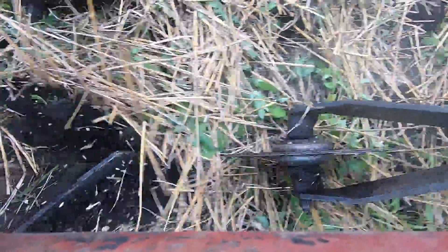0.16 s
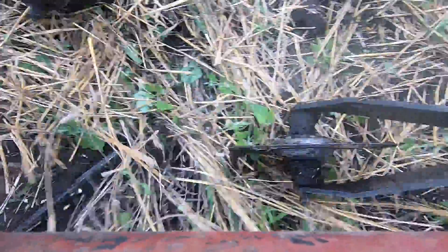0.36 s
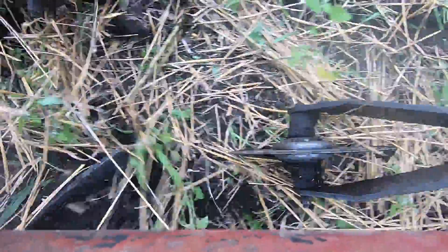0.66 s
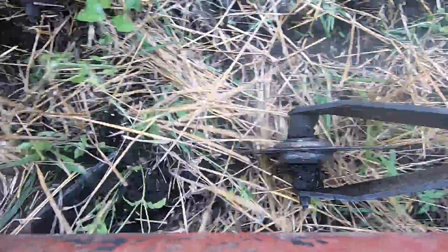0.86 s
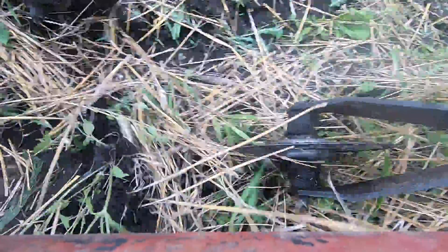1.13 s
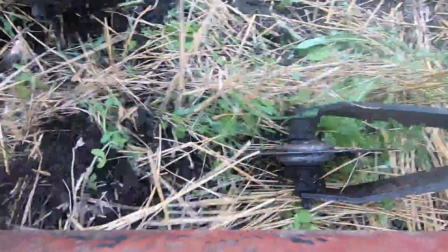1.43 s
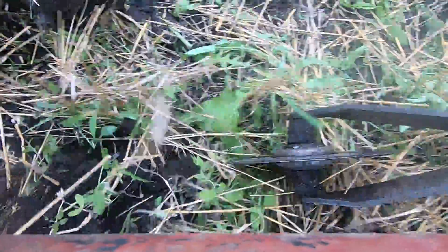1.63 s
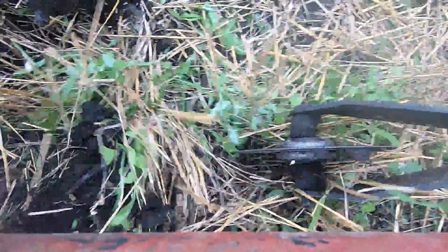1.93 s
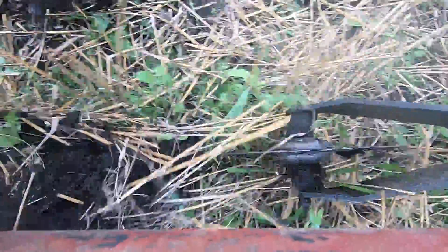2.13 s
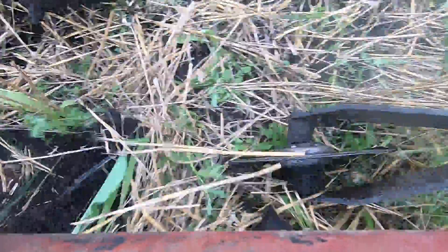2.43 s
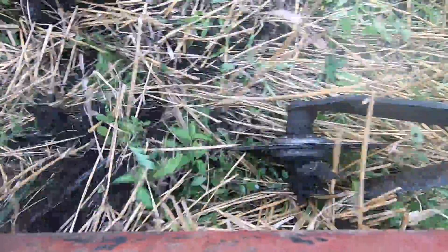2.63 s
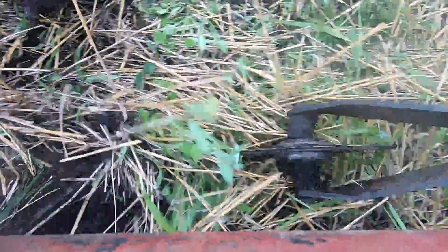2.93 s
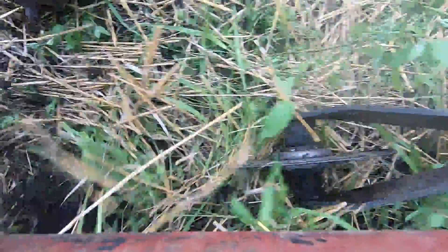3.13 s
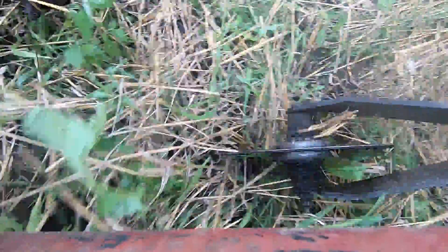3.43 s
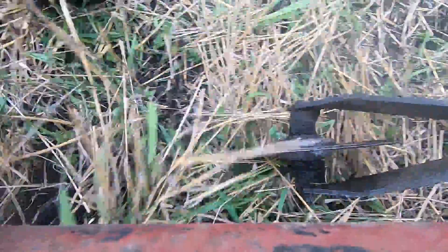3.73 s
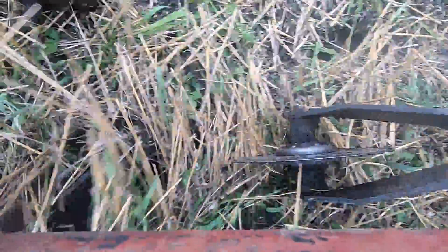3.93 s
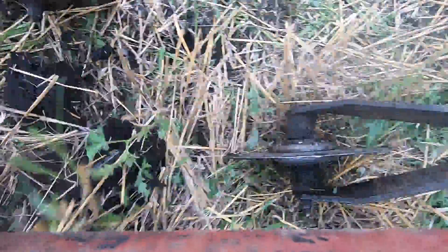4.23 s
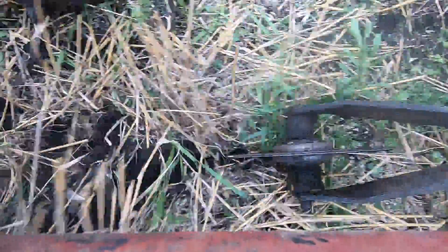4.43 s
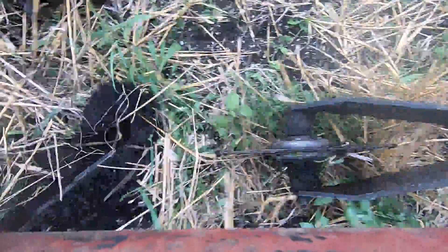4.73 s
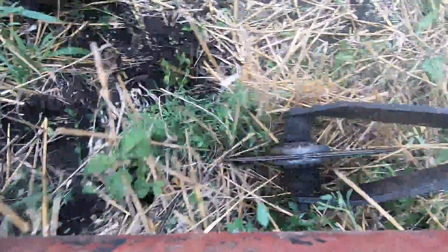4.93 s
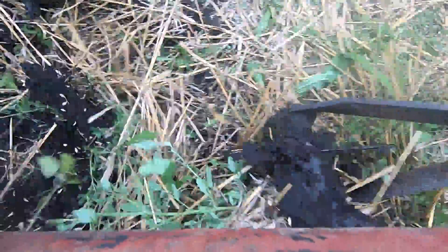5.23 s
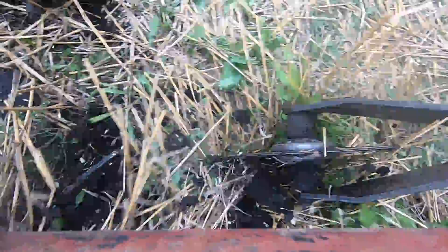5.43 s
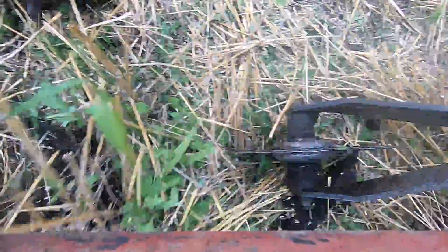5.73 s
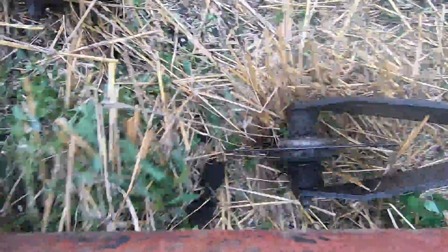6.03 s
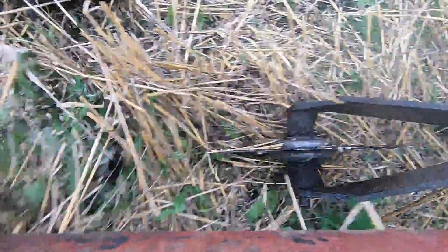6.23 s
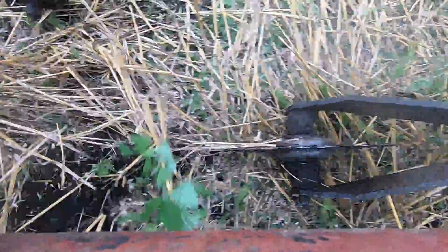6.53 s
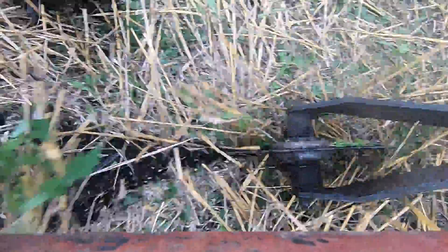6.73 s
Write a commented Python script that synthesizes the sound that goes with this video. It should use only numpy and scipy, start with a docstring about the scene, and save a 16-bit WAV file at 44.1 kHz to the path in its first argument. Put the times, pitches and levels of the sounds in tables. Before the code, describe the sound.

A tractor engine drones loudly just ahead, deep and slightly throbbing, with a light knock and a faint gear whine that comes and goes. Close to the microphone on the plow frame, a disc hisses and crackles through soil and dry stubble. Stalks snap, the linkage and stones clank against the steel, and a few clods thud softly. The engine sags a little in pitch as it pulls across the field.

```python
"""A six-cylinder tractor drones just ahead, heard from a microphone on the frame of the plow it pulls.
The exhaust sounds at the firing rate and throbs once an engine cycle; the gears whine faintly under load.
Close by, the coulter disc crunches through the stubble and stalks snap. The linkage and stones clank,
ringing the frame, and clods thud against the steel."""
import sys
import numpy as np
from scipy import signal
from scipy.fft import rfft, irfft
from scipy.io import wavfile

SR = 44100
rng = np.random.default_rng(int(sys.argv[2]) if len(sys.argv) > 2 else 0)


def log_audio(samples):
    """Write samples as a 16-bit WAV file to the path given in sys.argv[1]."""
    # one column per channel
    frames = np.atleast_2d(samples).T
    # limit to full scale, then quantise
    limited = np.clip(frames, -1, 1)
    pcm = np.round(limited * 32767).astype(np.int16)
    wavfile.write(sys.argv[1], SR, pcm)


N = 302526
TIME = np.arange(N) / SR
BIN_HZ = np.fft.rfftfreq(N, 1 / SR)
CYLINDERS = 6


def amp(db):
    """Decibels to gain."""
    return 10 ** (np.asarray(db) / 20)


def unit(x):
    """Scales to rms 1."""
    return x / np.sqrt(np.mean(x ** 2) + 1e-20)


def curve(rows):
    """Joins (seconds, value) rows into a value at every sample."""
    return np.interp(TIME, *np.transpose(rows))


def colour(x, spectrum):
    """Filters by a spectrum of (Hz, dB) rows."""
    hz, db = np.transpose(spectrum)
    return irfft(rfft(x) * amp(np.interp(np.log(BIN_HZ + 1), np.log(hz), db)), N)


def white():
    """Noise of 0 dB per Hz."""
    return rng.standard_normal(N) * np.sqrt(SR / 2)


def drift(hz):
    """A random wander of rms 1, up to about hz."""
    return unit(irfft(rfft(rng.standard_normal(N)) * np.exp(-(BIN_HZ / hz) ** 2), N))


def resonate(x, hz, width_hz, passes=1):
    """A resonance of gain 1; more passes soften its attack."""
    for _ in range(passes):
        x = signal.lfilter(*signal.iirpeak(hz, hz / width_hz, SR), x)
    return x


def add(mix, start_s, sound):
    """Mixes a sound in at start_s."""
    part = mix[max(round(start_s * SR), 0):][:len(sound)]
    part += sound[:len(part)]


def burst(decay_s, rise_s, grain):
    """A cluster of tiny impacts: its grit, and an envelope that swells and dies."""
    t = np.arange(SR // 5) / SR
    envelope = (1 - np.exp(-t / rise_s)) * np.exp(-t / decay_s)
    grit = rng.standard_normal(len(t)) * np.exp(grain * rng.standard_normal(len(t)))
    return unit(grit), envelope / envelope.max()


# Engine speed, sagging in heavy soil. Each row: time in seconds, firings per second.
FIRING_RATE = [(0.0, 83.73), (0.5, 87.76), (1.11, 84.35), (1.53, 84.65), (1.91, 82.39), (2.35, 81.68),
               (2.64, 83.85), (3.09, 84.09), (3.9, 81.98), (4.2, 82.84), (4.93, 79.73), (5.33, 80.34),
               (5.7, 81.54), (6.09, 81.01), (6.86, 79.67)]

def engine_cycles():
    """Counts engine cycles; every cylinder fires once in each."""
    return np.cumsum(curve(FIRING_RATE)) / SR / CYLINDERS


# The exhaust, steady but for three shallow dips. Each row: time in seconds, level in dB.
EXHAUST_LEVEL = [(0, -13.5), (1.3, -13.4), (1.52, -15.5), (1.8, -13), (2.0, -15), (2.56, -13.1),
                 (2.75, -15.5), (3.2, -13), (6.86, -13.4)]

def exhaust(cycle, load_db, throb=0.14, sway_rad=0.29):
    """Unequal cylinders make the firing tone swell and drag once a cycle; load hardens it."""
    swing = np.cos(2 * np.pi * (cycle - 0.2))
    phase = 2 * np.pi * CYLINDERS * cycle
    fundamental = (1 + throb * swing) * np.cos(phase - sway_rad * swing)
    # two overtones sharpen each trough into a soft pulse
    second = amp(-28) * np.cos(2 * phase)
    third = amp(-30 + 0.95 * load_db) * np.cos(3 * phase)
    level_db = curve(EXHAUST_LEVEL) + 0.2 * drift(4.4)
    return np.sqrt(2) * amp(level_db) * (fundamental - second + third)


# Low engine tones. Each row: multiple of the cycle rate, level in dB at average load.
HUM_TONES = [(3, -42), (4, -45), (8, -44.5), (9, -39.5), (10, -38.5), (11, -47.5), (13, -46.5), (14, -48.5),
             (15, -51), (16, -44.5), (17, -52.5), (19, -55)]

def hum(cycle, load_db):
    """Weak tones around the firing harmonics grow with the load."""
    tones = sum(amp(db + drift(0.56)) * np.cos(2 * np.pi * (round(multiple) * cycle + rng.random()))
                for multiple, db in HUM_TONES)
    return np.sqrt(2) * amp(0.59 * load_db) * tones


# How hard the engine works. Each row: time in seconds, relative knock level in dB.
ENGINE_LOAD = [(0, -32), (.65, -39), (1.3, -35.5), (2.7, -39), (3.3, -37.5), (4.05, -40.5), (4.4, -35),
               (5.1, -32.5), (5.8, -37.5), (6.05, -34.5), (6.45, -36), (6.86, -32.5)]
# One cycle's knocks. Each row: start as a share of the cycle, strength in dB, pitch in Hz, width in Hz.
CYCLE_KNOCKS = [(.003, 0, 645, 125), (.198, -8.5, 570, 190), (.346, -7, 505, 270), (.433, -8.5, 600, 220),
                (.578, -8.5, 610, 160), (.835, -4.5, 620, 175)]

def knocks(cycle, level_db=-1.9, uneven_db=1.84):
    """The same uneven run of knocks returns every cycle, the first one loudest and longest."""
    out = np.zeros(N)
    for start, db, hz, width_hz in CYCLE_KNOCKS:
        turn = cycle - start
        blows = np.diff(np.floor(turn), prepend=np.floor(turn[0]))
        rattle = unit(np.exp(-2 * CYLINDERS * (turn % 1)) * white())
        drive = unit(blows * amp(uneven_db * rng.standard_normal(N))) + 0.29 * rattle
        out += amp(db) * unit(resonate(drive, hz, width_hz, passes=3))
    return amp(curve(ENGINE_LOAD) + level_db) * unit(out)


# Engine clatter, from behind the tractor. Each row: frequency in Hz, dB per Hz at average load.
CLATTER_SPECTRUM = [(150, -96.5), (370, -74), (480, -67.5), (650, -67.5), (830, -69.5), (1050, -80),
                    (1600, -78), (2000, -84), (4000, -98.5), (16000, -150)]

def clatter(cycle, load_db):
    """Mechanical noise beats with the firings and grows with the load."""
    beat = 1 + 0.12 * np.cos(2 * np.pi * CYLINDERS * cycle)
    return colour(white() * beat, CLATTER_SPECTRUM) * amp(0.59 * load_db)


# The chassis and wheels. Each row: frequency in Hz, typical level in dB per Hz.
RUMBLE_SPECTRUM = [(8, -83), (25, -64.5), (42, -64.5), (60, -44), (90, -53.5), (130, -49.5), (190, -65),
                   (270, -63.5), (370, -73), (700, -88.5), (2000, -140)]

def rumble(lumpy_db=2.0):
    """The chassis and wheels rumble unevenly over the field."""
    return colour(white() * amp(lumpy_db * drift(22)), RUMBLE_SPECTRUM)


# Whines from the drive train ahead. Each row: loudest moment in seconds, half length in seconds,
# multiple of the cycle rate, top level in dB.
GEAR_WHINES = [(0.15, 0.25, 39.6, -41), (.57, 0.19, 64.6, -41), (4.65, 0.29, 120, -48.5),
               (5.097, 0.12, 20.7, -36), (6.037, 0.18, 41.6, -36), (6.067, 0.44, 120, -47),
               (6.473, 0.22, 20.7, -36), (6.747, 0.21, 41.6, -39.5)]

def gears(cycle, waver_db=3.0, wobble_rad=0.55):
    """Rough gear tones come and go, locked to the engine speed."""
    out = np.zeros(N)
    for centre_s, half_s, multiple, db in GEAR_WHINES:
        swell = np.exp(-((TIME - centre_s) / half_s) ** 4 / 2) * amp(db + waver_db * drift(20))
        out += swell * np.cos(2 * np.pi * multiple * cycle + wobble_rad * drift(35))
    return out


# Soil and straw sliding over steel. Each row: frequency in Hz, relative level in dB.
SOIL_SPECTRUM = [(300, -26), (1000, 3.5), (1600, 2), (2100, 0.5), (3800, -1.5), (5000, -6), (6400, -15),
                 (8400, -16), (9000, -21.5), (11000, -27.5), (13000, -35), (15500, -50.5)]
# How hard the disc cuts, close to the microphone. Each row: time in seconds, relative level in dB.
CUTTING_LEVEL = [(0, -47), (.28, -46), (.45, -41.5), (1.1, -45.5), (2.05, -42.5), (2.9, -43), (4.05, -44),
                 (4.23, -46), (4.75, -45), (5.25, -41.5), (5.65, -43), (6.05, -42), (6.86, -44.5)]

def coulter(hiss_db=-0.5, crackle_db=-7.5, cracks_per_s=900, clump_db=1.37):
    """The disc slices soil with a hiss and breaks fibres in spurts of tiny cracks."""
    sizes = amp(-0.5 * np.minimum(rng.exponential(1, N), 3)) * rng.choice([-1, 1], N)
    cracks = sizes * (rng.random(N) < cracks_per_s / SR)
    spurts = amp(4 * np.minimum(drift(35), 2))
    hiss = amp(hiss_db) * unit(colour(white(), SOIL_SPECTRUM))
    crackle = amp(crackle_db) * unit(colour(cracks * spurts, SOIL_SPECTRUM))
    return (hiss + crackle) * amp(curve(CUTTING_LEVEL) + clump_db * drift(21))


def straw(level_db=-9, ticks_per_s=190, low_hz=2300, high_hz=8200, pitches=24):
    """Stems flick and crack at the disc all the time, each ringing briefly at its own pitch."""
    out = np.zeros(N)
    for hz in np.geomspace(low_hz, high_hz, pitches):
        sizes = amp(3.3 * np.minimum(rng.exponential(1, N), 3))
        ticks = sizes * (rng.random(N) < ticks_per_s / pitches / SR)
        out += resonate(ticks, hz * rng.uniform(1.0, 1.03), width_hz=330)
    return amp(curve(CUTTING_LEVEL) + level_db) * unit(colour(out, SOIL_SPECTRUM))


# Swells in the top treble. Each row: loudest moment in seconds, half length in seconds, level in dB.
SIZZLE_SWELLS = [(.4, 0.29, -68), (5.25, 0.31, -72)]

def sizzle(grain_db=3):
    """A faint, very high, grainy hiss swells and fades."""
    swells = sum(amp(db) * np.exp(-((TIME - centre_s) / half_s) ** 2)
                 for centre_s, half_s, db in SIZZLE_SWELLS)
    grit = white() * amp(grain_db * drift(150))
    return swells * unit(resonate(grit, hz=12500, width_hz=4000, passes=2))


# The plow frame under the microphone. Each row: resonance in Hz, width in Hz, gain in dB.
FRAME_MODES = [(340, 150, 2), (494, 120, 0), (665, 130, 0), (900, 77, 6.5), (1054, 250, 7.5),
               (1356, 130, 7), (1530, 71, 6), (1560, 47, -4), (2270, 97, 4.5), (2660, 62, 3.5)]
# The harder blows. Each row: time in seconds, relative level in dB, centre pitch in Hz.
HARD_CLANKS = [(.18, -29, 890), (.383, -26, 840), (.416, -25, 960), (.853, -28.5, 940),
               (1.406, -28.5, 1210), (1.438, -30.5, 1550), (1.856, -24, 1400), (1.909, -19, 1500),
               (1.987, -26.5, 1550), (2.187, -27, 1410), (2.221, -30, 2000), (2.345, -27, 2950),
               (2.49, -28.5, 1380), (2.631, -27, 1540), (3.343, -27.5, 880), (3.488, -27.5, 1090),
               (3.647, -29, 1250), (3.91, -27.5, 1490), (3.95, -28, 1410), (4.553, -24, 1820),
               (5.273, -29.5, 1190), (5.292, -27, 1350), (6.045, -27.5, 1270), (6.16, -32, 1390)]

def clanks(level_db=-4, light_per_s=1.5, rise_s=0.00215, scrape=0.24, cutoff_hz=4500):
    """Gritty blows of linkage and stones ring the frame; lighter ones fall at random in between."""
    draws = rng.uniform(-1, 1, (round(light_per_s * N / SR), 3))
    light_clanks = [((when + 1) / 2 * N / SR, -33 + 2 * size, 1100 * 2 ** (0.3 * pitch))
                    for when, size, pitch in draws]
    out = np.zeros(N)
    for time_s, db, hz in HARD_CLANKS + light_clanks:
        grit, envelope = burst(decay_s=0.012, rise_s=rise_s, grain=0.7)
        blow = resonate(grit, hz, 0.75 * hz) * envelope
        ring = sum(amp(gain_db) * resonate(blow, mode_hz, width_hz)
                   for mode_hz, width_hz, gain_db in FRAME_MODES)
        add(out, time_s - rise_s, amp(db + level_db) * np.std(envelope) * unit(ring + scrape * blow))
    return signal.sosfilt(signal.butter(2, cutoff_hz, fs=SR, output="sos"), out)


# Thicker stalks breaking close by. Each row: start in seconds, relative level in dB.
STALK_SNAPS = [(0.5602, -30), (.7557, -34.5), (.8375, -36), (1.0123, -37), (1.477, -34), (2.3443, -27),
               (3.2677, -38), (3.425, -38.5), (3.9459, -35), (4.55, -23.5), (4.92, -32.5), (4.939, -33),
               (5.295, -32.5), (5.7032, -29.5), (5.714, -32.5), (5.861, -28), (6.008, -34.5), (6.031, -33)]

def snaps(level_db=-3, crack_hz=3950, stem_db=-3, cutoff_hz=8800):
    """Dry stalks break with short bright cracks; each hollow stem rings at its own pitch."""
    out = np.zeros(N)
    for start_s, db in STALK_SNAPS:
        grit, envelope = burst(decay_s=0.0055, rise_s=0.00032, grain=1.0)
        crack = unit(resonate(grit, crack_hz, 0.55 * crack_hz) * envelope)
        stem = unit(resonate(crack, crack_hz * rng.uniform(0.82, 1.25), width_hz=350))
        add(out, start_s, amp(db + level_db) * np.std(envelope) * unit(crack + amp(stem_db) * stem))
    return signal.sosfilt(signal.butter(4, cutoff_hz, fs=SR, output="sos"), out)


# Clods tumbling onto the plow. Each row: loudest moment in seconds, level in dB.
CLOD_THUDS = [(1.892, -39), (2.643, -34), (3.51, -29), (3.94, -32.5), (5.316, -26), (5.4, -28),
              (6.119, -32.5)]

def clods(half_s=0.032):
    """Soft lumps of earth thud without ringing."""
    envelope = sum(amp(db) * np.exp(-((TIME - centre_s) / half_s) ** 2) for centre_s, db in CLOD_THUDS)
    return envelope * unit(resonate(white(), hz=222, width_hz=140, passes=2))


def scene():
    """Out in the stubble field, in mono: the tractor ahead, the plow close by."""
    cycle = engine_cycles()
    load_db = curve(ENGINE_LOAD) - curve(ENGINE_LOAD).mean()
    tractor = exhaust(cycle, load_db) + hum(cycle, load_db) + knocks(cycle)
    tractor += gears(cycle) + clatter(cycle, load_db) + rumble()
    plow = coulter() + straw() + clanks() + snaps() + clods()
    return (tractor + plow + sizzle())[None]


# Treble resonances of the microphone port. Each row: centre in Hz, width in Hz, boost in dB.
PORT_RESONANCES = [(7750, 1000, 7), (9620, 450, 4), (10950, 700, 6)]

def record(dry):
    """The microphone on the plow frame: its port colours the treble, and the band ends at 15.7 kHz."""
    port_db = sum(db * np.exp(-(2 * (BIN_HZ - hz) / width_hz) ** 2)
                  for hz, width_hz, db in PORT_RESONANCES)
    heard = irfft(rfft(dry) * amp(port_db), N)
    lowpass = signal.firwin(511, 15700, window=("kaiser", 9), fs=SR)
    return signal.oaconvolve(heard, lowpass[None], "same")


dry = scene()
out = record(dry)
log_audio(out)
```